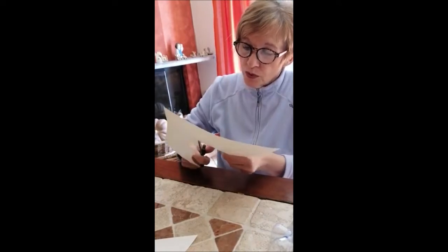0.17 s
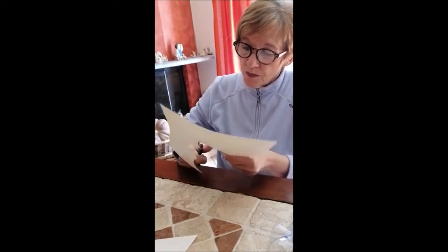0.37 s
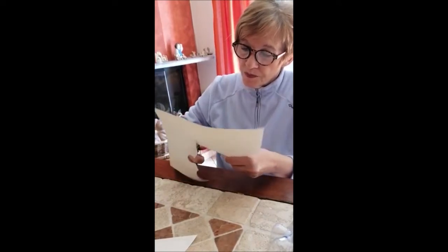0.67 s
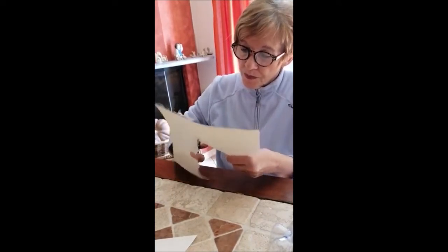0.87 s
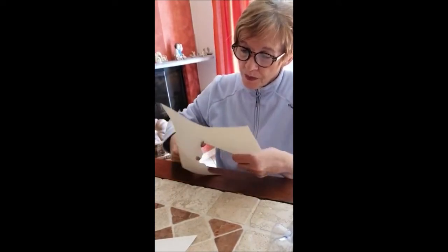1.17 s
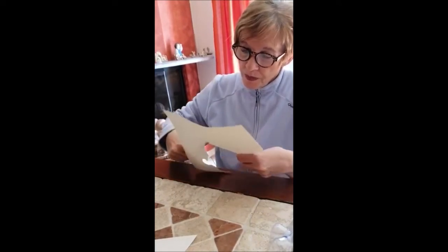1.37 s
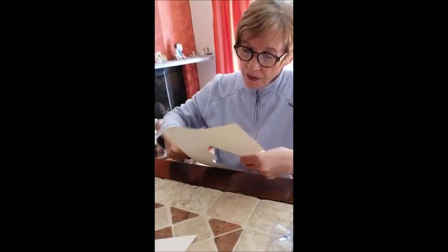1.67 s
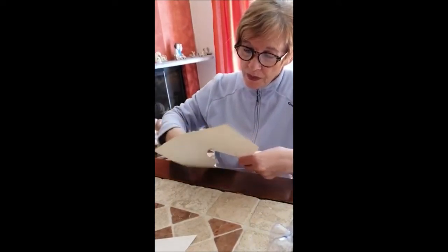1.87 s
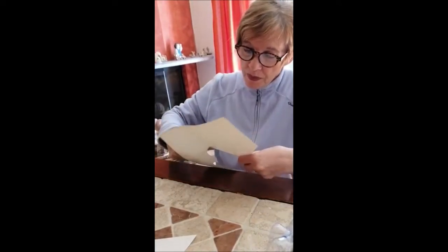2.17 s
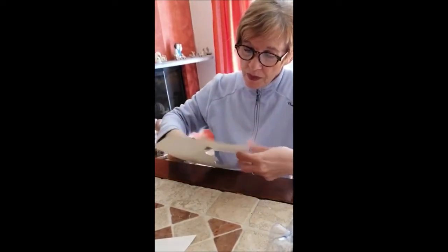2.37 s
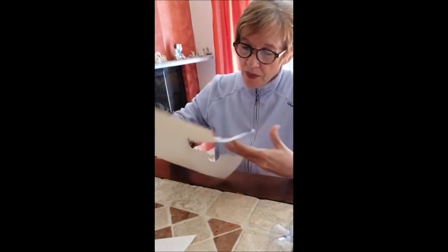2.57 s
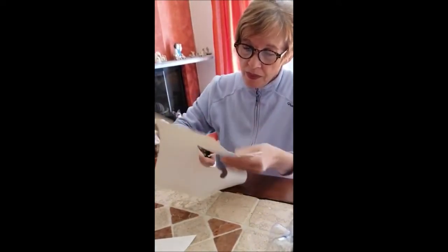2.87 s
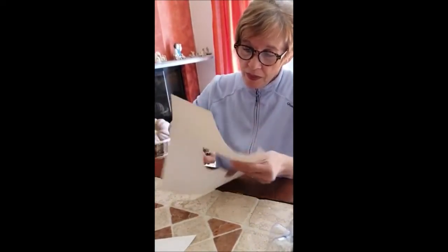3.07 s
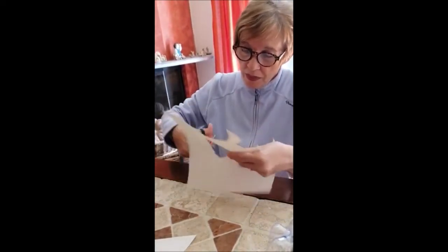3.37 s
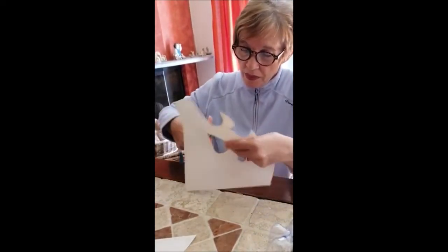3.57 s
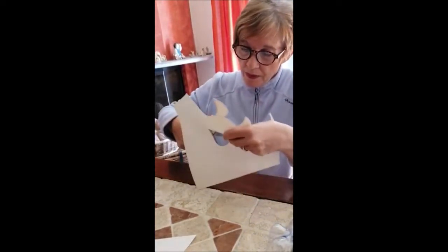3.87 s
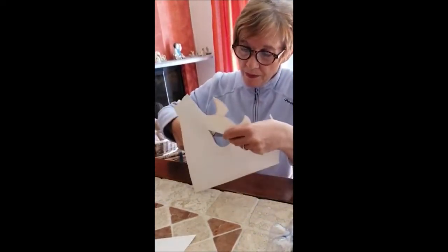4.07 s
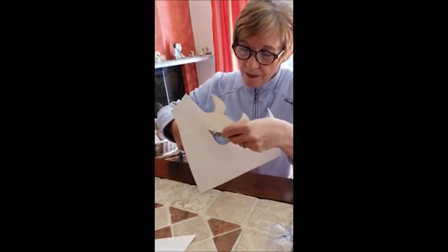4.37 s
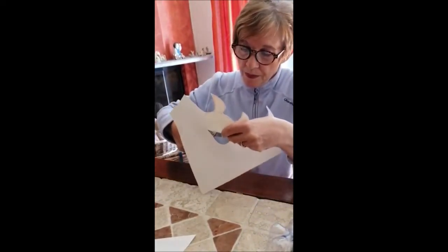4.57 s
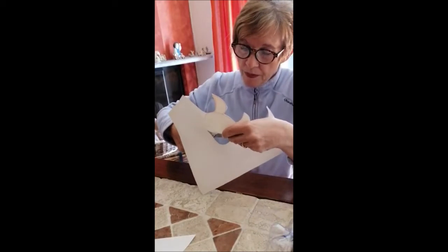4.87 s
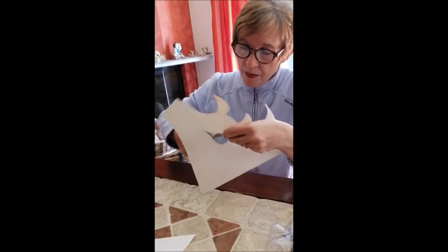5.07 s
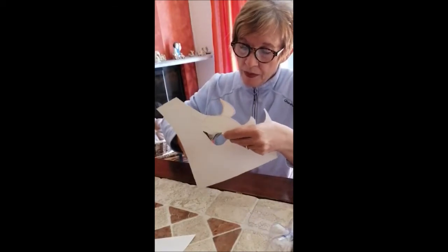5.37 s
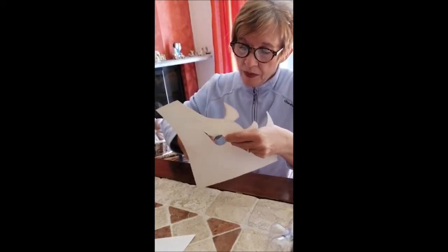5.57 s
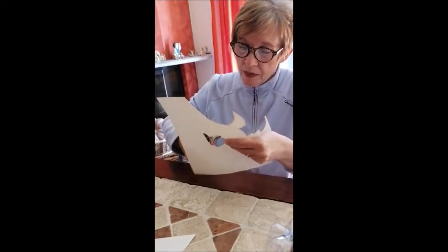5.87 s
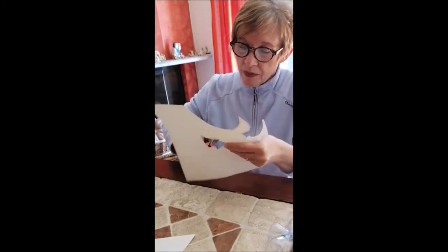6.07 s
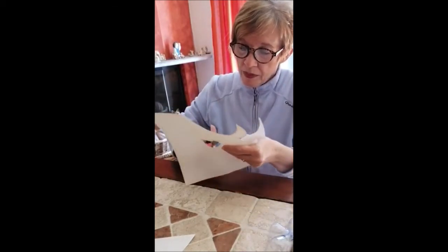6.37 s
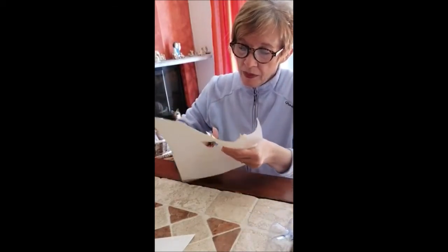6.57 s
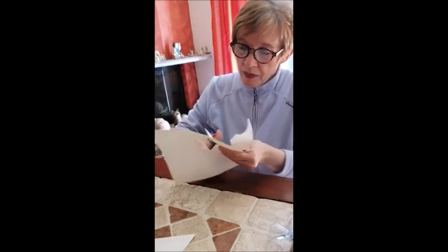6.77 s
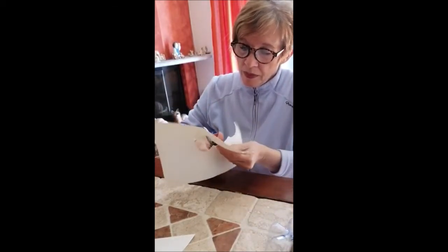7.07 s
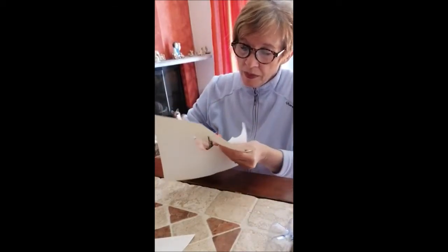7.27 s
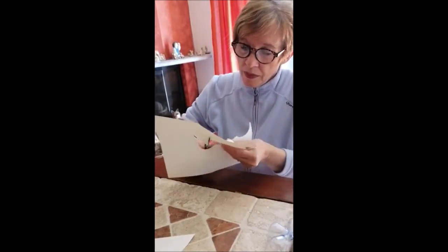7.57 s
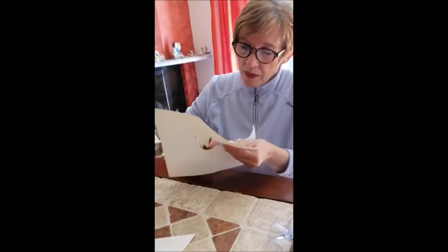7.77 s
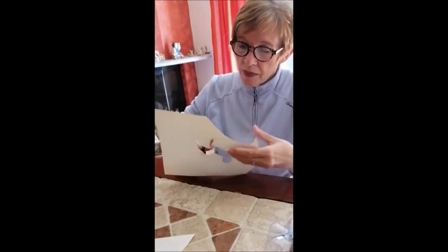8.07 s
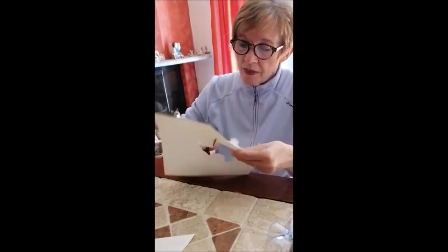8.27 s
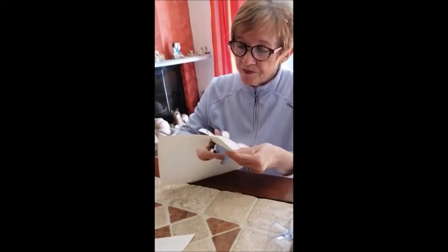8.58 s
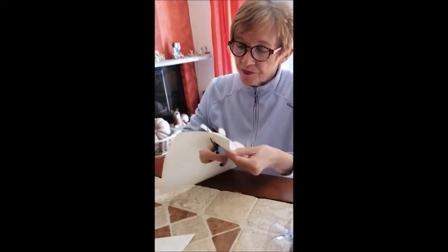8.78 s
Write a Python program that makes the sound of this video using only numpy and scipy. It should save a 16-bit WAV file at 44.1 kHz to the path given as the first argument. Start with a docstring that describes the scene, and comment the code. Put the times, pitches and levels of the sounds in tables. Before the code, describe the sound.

Scissors cut irregularly through stiff paper in a small, quiet room, with crackles, sharp snaps, hollow flexing and light blade ticks.

```python
"""Scissors cut round a shape in stiff paper, held over a table in a small, quiet room.
From the start, parting fibres crackle, the sliding sheet hisses and booms, and fingers rumble on it.
Within a second the paper snaps, hand and sheet knock dully, the blades tick and cut edges fizz.
From about 2 s a blade rasps along the edge now and then; near 5 s and 7 s the steel squeaks faintly.
The cutting goes on to the end, near 9 s. Two microphones hear it all, with the room's echo."""
import sys
import numpy as np
from scipy import signal
from scipy.fft import rfft, irfft
from scipy.io import wavfile

SR = 44100
rng = np.random.default_rng(int(sys.argv[2]) if len(sys.argv) > 2 else 0)


def unload_audio(sound):
    """Save the sound as a 16-bit wav file, at the path given as the first command line argument."""
    columns = np.transpose(np.atleast_2d(sound))
    # keep every value between -1 and 1, then stretch to whole-number steps
    steps = np.round(np.clip(columns, -1, 1) * 32767)
    wavfile.write(sys.argv[1], SR, steps.astype(np.int16))


N = 393813
TIME = np.arange(N) / SR

# Levels are relative: each sound adds its own gain. A swell is the level change from start to end.
# blade strokes and sheet turns: t/s, length/s, swell/dB, crackle/dB, hiss/dB, boom/dB, boom f/Hz
STROKES = [(0.0, 0.056, -25.5, -53.5, -60, -48, 590), (0.082, 0.23, -8.5, -60.5, -61, -56, 520),
           (0.346, 0.11, -4, -57, -58.5, -52, 577), (0.43, 0.26, -8, -61.5, -82, -56.5, 640),
           (0.624, 0.064, 1, -47, -48, -44.5, 615), (0.744, 0.078, -5, -52, -48.5, -52, 695),
           (0.943, 0.29, 2, -58, -53, -56.5, 745), (1.219, 0.18, -10.5, -53, -55.5, -48.5, 805),
           (1.378, 0.14, -6, -60.5, -59, -55.5, 610), (1.562, 0.11, -7.5, -58, -56.5, -50.5, 530),
           (1.746, 0.03, -14, -53, -50, -48, 730), (1.847, 0.15, 7, -59.5, -54, -58, 550),
           (1.994, 0.26, 1.5, -62.5, -61.5, -62, 526), (2.291, 0.072, 3, -51.5, -55, -51, 785),
           (2.443, .31, 7, -79, -65, -76, 545), (2.545, 0.1, 5, -59, -65, -61, 533),
           (2.76, 0.18, 2.5, -54.5, -56, -56.5, 670), (2.967, 0.063, 10, -49, -48, -48, 660),
           (3.091, 0.099, -6, -48.5, -44.5, -56.5, 720), (3.216, 0.13, 2, -52.5, -51, -62, 586),
           (3.437, 0.17, 7, -54.5, -54, -52, 523), (3.65, 0.12, 14, -71, -67, -85, 520),
           (3.776, 0.035, 5.5, -54.5, -53, -65, 700), (3.888, 0.12, 2, -63, -65.5, -68, 587),
           (4.258, 0.13, 7.5, -54.5, -55.5, -63, 675), (4.398, 0.12, -2, -61, -64, -65.5, 800),
           (4.616, 0.019, 1, -63, -64, -96, 494), (4.868, 0.51, 6.5, -56, -52.5, -60.5, 730),
           (5.359, 0.06, -24.5, -54.5, -69, -57, 760), (5.565, 0.09, -7, -56, -56.5, -56.5, 890),
           (5.701, 0.17, -14.5, -60.5, -60.5, -61.5, 890), (6.042, 0.082, -4, -66.5, -69, -64.5, 563),
           (6.17, .2, -11, -56, -50.5, -56.5, 688), (6.535, 0.2, 10.5, -56.5, -53.5, -57.5, 760),
           (6.85, 0.16, 6.5, -57, -58, -60, 614), (7.14, 0.13, 15.5, -58.5, -57.5, -55.5, 575),
           (7.274, 0.053, 2, -52, -54, -55, 670), (7.424, 0.12, -13, -56.5, -54.5, -53.5, 770),
           (7.664, 0.12, 1, -55, -53.5, -59, 760), (7.851, 0.028, -3, -58, -61, -54, 706),
           (7.948, 0.096, 6, -56, -57, -64, 750), (8.027, 0.076, 5.5, -58.5, -55.5, -54.5, 625),
           (8.213, 0.023, -2, -59, -61.5, -55, 536), (8.332, 0.26, 8.5, -53, -52, -56, 537),
           (8.597, 0.21, 4, -53.5, -52.5, -73, 510), (8.793, 0.14, 12, -44.5, -45, -57.5, 646)]
# the fingers change their grip: t/s, length/s, level/dB
GRIPS = [(0.0, 0.22, -60), (1.384, .27, -69), (1.925, .16, -59.5), (2.3, 0.086, -65.5), (2.742, 0.094, -61),
         (3.213, 0.089, -55.5), (3.475, 0.098, -54), (3.854, 0.071, -65.5), (4.396, 0.039, -76),
         (6.18, 0.29, -67.5), (6.786, .12, -71), (7.31, 0.21, -76), (8.037, 0.16, -67.5),
         (8.356, 0.15, -63), (8.553, 0.14, -55.5), (8.76, .18, -68)]
# the sheet snaps under the blades or buckles: t/s, crack/dB, pop/dB, pop f/Hz, treble/dB
SNAPS = [(0.1062, -35.5, -47, 497, -59), (0.2016, -34, -30, 488, -46.5), (0.2849, -47, -52, 450, -52),
         (0.385, -42, -42, 530, -66), (0.4, -28.5, -49, 646, -47.5), (0.4299, -29.5, -36.5, 575, -44),
         (0.4983, -34.5, -43.5, 603, -48.5), (0.7028, -32, -40, 610, -39), (0.9136, -43, -46.5, 680, -51),
         (0.9441, -35.5, -41, 710, -43.5), (0.9751, -35.5, -45.5, 460, -45.5),
         (1.0697, -39, -45.5, 587, -47.5), (1.2304, -34, -39, 853, -52), (1.2852, -31.5, -44, 550, -52),
         (1.3365, -27, -35.5, 672, -40), (1.5918, -29.5, -34.5, 538, -55), (1.6137, -27.5, -40, 508, -47),
         (1.7419, -28, -37.5, 617, -48.5), (1.8784, -47, -42.5, 585, -71), (2.292, -33, -44, 820, -49.5),
         (2.3351, -39, -52, 685, -51), (2.5551, -37.5, -56.5, 546, -53.5), (2.618, -39, -54, 430, -52),
         (2.7632, -38, -50.5, 410, -49), (2.8534, -33, -76, 432, -48), (2.9186, -33.5, -51, 420, -46.5),
         (2.9769, -24, -35.5, 717, -40.5), (2.9849, -27.5, -37.5, 555, -41), (3.014, -30, -41, 520, -40),
         (3.0294, -26.5, -46, 573, -37), (3.1251, -28.5, -54, 834, -44), (3.215, -32.5, -50, 460, -34.5),
         (3.2964, -39, -65, 490, -42), (3.4434, -50, -48.5, 573, -54), (4.413, -36.5, -49.5, 684, -42.5),
         (5.2815, -34, -63, 457, -60), (5.5787, -40, -50, 650, -48.5), (5.7111, -33.5, -61, 660, -51),
         (5.8077, -33.5, -55, 657, -46.5), (6.1788, -27.5, -46, 530, -59), (6.483, -41, -64, 580, -57),
         (6.6621, -35, -47.5, 505, -43), (7.1604, -41, -56.5, 495, -54.5), (7.3873, -34.5, -52, 800, -53.5),
         (7.414, -28, -35.5, 823, -42), (7.442, -36, -42, 780, -51), (7.7204, -36, -39.5, 687, -43),
         (7.778, -44, -49.5, 655, -45), (7.8555, -40.5, -45, 700, -48), (8.0101, -30.5, -71, 660, -43.5),
         (8.03, -29, -74, 581, -49), (8.3784, -38, -44.5, 625, -69), (8.4461, -30.5, -59, 583, -45),
         (8.5686, -30, -52, 560, -44)]
# dull knocks of hand and sheet: t/s, clap/dB, thump/dB
KNOCKS = [(0.135, -54, -55), (2.004, -53, -48.5), (3.296, -20.5, -48.5), (3.545, -19.5, -41.5),
          (3.589, -31, -48), (3.882, -58, -58), (4.414, -31.5, -52.5), (6.7722, -14.5, -37.5),
          (6.777, -11, -47), (8.13, -42, -49.5)]
# the blades tick against each other: t/s, level/dB, f/Hz, share sent into the room/dB
TICKS = [(0.399, -50, 7500, -6), (2.1243, -38, 8100, -9), (3.1784, -27.5, 6840, -10),
         (3.2833, -20, 5500, -0.5), (5.6026, -33, 7100, -16), (6.1775, -24.5, 7500, 0),
         (7.493, -30, 7160, -13), (7.5094, -27.5, 7240, 2), (7.6525, -23.5, 7100, -4),
         (8.8307, -29, 8100, -9)]
# quick slides along a cut edge: t/s, length/s, swell/dB, level/dB
EDGE_SLIDES = [(0.65, 0.065, -8, -51.5), (1.9, 0.072, 8, -56), (2.42, .55, -3, -70.5),
               (2.975, 0.069, -6, -57), (3.04, .25, 0, -72), (3.585, 0.021, -8, -51.5),
               (6.176, 0.022, -15, -40), (6.21, 0.088, -13, -59), (8.52, 0.06, -4, -55),
               (8.74, 0.22, 6, -59)]
# a blade rasps along the cut edge: t/s, length/s, swell/dB, level/dB, f/Hz
RASPS = [(1.867, 0.11, -4, -44.5, 2800), (2.752, 0.11, -21, -48.5, 2490), (3.333, 0.038, 7, -43, 2680),
         (4.89, 0.28, 2, -48, 2700), (6.512, 0.2, -16, -48, 2400), (8.222, .05, -8, -50.5, 2100)]
# steel rubs on steel: t/s, length/s, swell/dB, level/dB
SQUEAKS = [(4.80, 0.11, 14, -53), (4.99, 0.057, -3, -47.5), (6.975, 0.03, -2, -48)]

# tone of parting fibres: f/Hz, level/dB
CRACKLE_TONE = [(400, -34), (800, -11.5), (1400, -3.5), (2000, 1), (3000, -0.5), (3800, -11), (5500, -15.5),
                (9000, -36)]
# tone of sliding paper: f/Hz, level/dB
HISS_TONE = [(1500, -21), (3800, -14.5), (5200, -4.5), (6400, 0), (7300, 3), (8100, 0), (8900, -3),
             (10000, -12), (11000, -17.5), (15000, -28)]
# tone of the bending sheet: f/Hz, level/dB
BOOM_TONE = [(150, -21.5), (300, -10.5), (420, -1.5), (520, 1), (700, -4), (1000, 3), (1400, 2.5),
             (2500, -7)]
# tone of fingers on the sheet: f/Hz, level/dB
RUMBLE_TONE = [(50, -49.5), (120, -0.5), (250, -2), (380, -8), (600, 1), (1500, -57)]
# tone of the background noise: f/Hz, level/dB
AIR_TONE = [(12, -49), (20, 6), (32, -11.5), (134, -14.5), (204, -21.5), (293, -18), (434, -27.5),
            (849, -25.5), (1860, -35.5), (2990, -33.5), (3950, -42), (7110, -59), (9950, -38.5),
            (14700, -34), (16000, -39)]
# tone of a knock's soft thump: f/Hz, level/dB
THUMP_TONE = [(20, -60), (50, -42), (115, -14.5), (185, -1), (300, -3), (490, 5.5), (750, -18), (2000, -38)]
# tone of a knock's papery clap: f/Hz, level/dB
CLAP_TONE = [(50, -55), (200, 1.5), (550, 2), (1000, 5.5), (1400, 5), (2000, 9.5), (3200, 2), (3900, -9.5),
             (4900, -9), (6500, -33), (12000, -48)]
# tone of a sliding cut edge: f/Hz, level/dB
FIZZ_TONE = [(5000, -35), (8000, 6), (9500, 0), (10800, -7), (12500, -5), (15000, -14), (16000, -12)]
# how long the room echoes: f/Hz, time to fade by 60 dB/s
ECHO_TIMES = [(120, 0.66), (500, 0.36), (1000, 0.49), (2500, 0.46), (7000, 0.32), (14000, 0.41)]
# how the two microphones differ: f/Hz, left minus right/dB
MIC_BALANCE = [(55, 5), (130, 0.5), (300, -2.5), (800, -3.5), (1150, -3.5), (1500, 0), (2100, -5),
               (2750, -6.5), (3800, 0), (4600, -2), (5600, -1.5), (7300, -11.5), (8700, 12), (10500, 6.5),
               (14000, -1)]

REST_DB = [-76.5, -75.5, -81.5]  # the held sheet is never quite still: crackle, hiss, boom
ATTACK_S, RELEASE_S = 0.0048, 0.016  # how fast a hand movement takes hold and lets go
MIC_DELAY_S = 0.000411  # time sound takes from one microphone to the other


def amp(db):
    """Turns decibels into a gain to multiply by."""
    return 10 ** (np.asarray(db) / 20)


def unit(x):
    """Scales a signal to an average strength (rms) of 1."""
    return x / np.sqrt(np.mean(x ** 2) + 1e-20)


def look_up(table, hz):
    """Reads between a table's rows on a log-frequency axis."""
    f, value = np.transpose(table)
    return np.interp(np.log(hz + 1), np.log(f), value)


def add(mix, start_s, sound):
    """Mixes a sound in at the given time."""
    part = mix[max(round(start_s * SR), 0):][:len(sound)]
    part += sound[:len(part)]


def colour(x, tone, size=2048):
    """Gives a sound a tone, with a filter that never rings ahead of the sound."""
    log_gain = np.log(amp(look_up(tone, abs(np.fft.fftfreq(size, 1 / SR)))))
    kernel = np.fft.ifft(np.exp(np.conj(signal.hilbert(log_gain)))).real
    return signal.oaconvolve(x, kernel[:size // 2])[:len(x)]


def resonate(x, hz, width_hz):
    """Makes a sound ring at a steady or moving pitch; a narrower width rings longer."""
    turn = np.exp(2j * np.pi * np.cumsum(hz * np.ones(len(x))) / SR)
    decay = np.exp(-np.pi * width_hz / SR)
    return 2 * (turn * signal.lfilter([1 - decay], [1, -decay], x / turn + 1e-18)).real


def grains(per_s, spread_db, clump_db, clump_s):
    """Tiny random breaks: clicks that grow louder and softer in clumps."""
    size = amp(spread_db * np.minimum(rng.exponential(1, N), 4))
    clicks = size * rng.choice([-1, 1], N) * (rng.random(N) < per_s / SR)
    clumps = np.interp(TIME / clump_s, np.arange(N), np.clip(rng.standard_normal(N), -2, 2))
    return unit(clicks * amp(clump_db * clumps))


def burst(decay_s, rise_s, size=4096):
    """A quick run of tiny breaks that swells and dies, nearly as strong at every pitch."""
    t = np.arange(size) / SR
    age = t / decay_s
    shape = np.exp(-age) * (1 - np.exp(-t / rise_s))
    spectrum = rfft(rng.standard_normal(size) * shape)
    return irfft(spectrum / (abs(spectrum) + 1e-12)) * np.exp(-age / 10)


def movement(length_s, swell_db):
    """Gain of one movement: it takes hold, grows or eases, and dies away."""
    t = np.arange(0, length_s + 10 * RELEASE_S, 1 / SR)
    held = amp(swell_db * (np.minimum(t / length_s, 1) - .5))
    return (1 - np.exp(-t / ATTACK_S)) * held * np.exp(-np.maximum(t - length_s, 0) / RELEASE_S)


def gain_of(rows):
    """Gain over time of a list of movements; where they overlap, their powers add."""
    power = np.zeros(N)
    for start_s, length_s, swell_db, level_db in rows:
        add(power, start_s, (amp(level_db) * movement(length_s, swell_db)) ** 2)
    return np.sqrt(power)


def pitch_of(rows, rest_hz):
    """Each movement pulls the paper to its own pitch (last column) while it lasts."""
    weight, total = np.zeros((2, N))
    for start_s, length_s, *_, hz in rows:
        pull = movement(length_s, 0)
        add(weight, start_s, pull)
        add(total, start_s, pull * hz)
    return (total + .01 * rest_hz) / (weight + .01)


def stroke_gains():
    """Gains of crackle, hiss and boom: the strokes on top of the held sheet's faint stir."""
    rows = np.array(STROKES)
    return [np.hypot(gain_of(np.c_[rows[:, :3], level_db]), amp(rest_db))
            for level_db, rest_db in zip(rows[:, 3:6].T, REST_DB)]


def catches(per_s=30, height=2.67, decay_s=0.0053):
    """The paper catches and gives at random: a gain with small surges."""
    gives = (rng.random(N) < per_s / SR) * rng.random(N)
    surges = signal.lfilter([1], [1, -np.exp(-1 / (decay_s * SR))], gives)
    return unit(1 + height * surges)


def cutting(crackle_gain, hiss_gain, boom_gain):
    """Fibres part and crackle, paper hisses along the blades, and the sheet's tension tunes its boom."""
    breaks = grains(per_s=800, spread_db=0, clump_db=3, clump_s=0.0051)
    crackle = unit(colour(breaks, CRACKLE_TONE)) * crackle_gain * amp(1.7)
    sliding = grains(per_s=1600, spread_db=4, clump_db=1.5, clump_s=0.005)
    hiss = unit(colour(sliding, HISS_TONE)) * hiss_gain * amp(3.5)
    pitch = pitch_of(STROKES, rest_hz=614)
    bending = colour(grains(per_s=400, spread_db=1.5, clump_db=4.5, clump_s=0.015), BOOM_TONE)
    boom = unit(resonate(resonate(bending, pitch, 450), pitch, 1160)) * boom_gain * amp(0.5)
    return catches() * (crackle + hiss + boom)


def crinkles(crackle_gain, hiss_gain, rise_cycles=1.52, pitches=24, per_pitch=28):
    """Small creases give way one by one, each ringing briefly at its own pitch."""
    out, t = np.zeros(N), np.arange(400) / SR
    times = rng.uniform(0, N / SR, (pitches, per_pitch))
    sizes_db = 4.75 * np.minimum(rng.exponential(1, times.shape), 3)
    for hz, starts, row_db in zip(np.geomspace(1600, 9500, pitches), times, sizes_db):
        age = t * hz / rise_cycles
        ring = age * np.exp(1 - age) * np.sin(2 * np.pi * hz * t)
        gain, tone = (crackle_gain, CRACKLE_TONE) if hz < 4000 else (hiss_gain, HISS_TONE)
        for start_s, size_db in zip(starts, row_db):
            add(out, start_s, ring * gain[int(start_s * SR)] * amp(look_up(tone, hz) + size_db + 7.5))
    return out


def finger_rumble(hold_db=-75):
    """Fingers rumble on the sheet: faintly as they hold it, more as they change grip."""
    rub = grains(per_s=300, spread_db=5, clump_db=-3.5, clump_s=0.012)
    grip = gain_of((start_s, length_s, 0, db) for start_s, length_s, db in GRIPS)
    return unit(colour(rub, RUMBLE_TONE)) * np.hypot(grip, amp(hold_db)) * amp(1.5)


def from_all_sides(pair):
    """Spectra of sound from all around: the microphones share the bass and differ in the treble."""
    hz, t, (left, other) = signal.stft(pair, SR, nperseg=512)
    shared = np.sinc(2 * hz * MIC_DELAY_S)[:, None] * 0.89
    right = shared * left + np.sqrt(1 - shared ** 2) * other
    return hz, t, np.array([left, right])


def air():
    """The still room and the microphones' own hiss."""
    _, _, spectra = from_all_sides(rng.standard_normal((2, N)))
    still_room = signal.istft(spectra, SR, nperseg=512)[1][:, :N]
    mic_hiss = 4.8 * rng.standard_normal((2, N))
    return unit(np.array([colour(x, AIR_TONE, size=8192) for x in still_room + mic_hiss])) * amp(-67.3)


def pop(hz, rise_s=0.0026, sag=0.044):
    """The sheet springs over: a few cycles that swell, fade and sink in pitch as the tension goes."""
    age = np.arange(4096) / SR / rise_s
    pitch = hz * (1 + sag * np.exp(-age / 2))
    return age * np.exp(-age) * np.sin(2 * np.pi * np.cumsum(pitch) / SR)


def snaps(decay_s=0.0037, rise_s=0.0033):
    """The paper gives with a sharp crack, a hollow pop and a flutter at nearby pitches."""
    out = np.zeros(N)
    for start_s, crack_db, pop_db, hz, treble_db in SNAPS:
        jolt = colour(burst(decay_s, rise_s=0.0028), BOOM_TONE)
        flutter = resonate(resonate(jolt, hz, 550), hz, 1180)
        body = (0.75 * unit(pop(hz)) + 0.45 * unit(flutter)) * amp(pop_db - 9.5)
        crack = unit(colour(burst(decay_s, rise_s), CRACKLE_TONE)) * amp(crack_db - 21.5)
        treble = unit(colour(burst(decay_s, rise_s), HISS_TONE)) * amp(treble_db - 7.5)
        add(out, start_s, body + crack + treble)
    return out


def knocks():
    """Hand and sheet knock: a soft thump under a tight papery clap."""
    out = np.zeros(N)
    for start_s, clap_db, thump_db in KNOCKS:
        thump = unit(colour(burst(decay_s=.002, rise_s=.0004), THUMP_TONE)) * amp(thump_db - 7.5)
        clap = unit(colour(burst(decay_s=.0014, rise_s=.0002), CLAP_TONE)) * amp(clap_db - 22)
        add(out, start_s, thump + clap)
    return out


def ticks():
    """Blades touch and the hand stops their ring at once; gives the direct sound and the room's share."""
    near, to_room = np.zeros((2, N))
    for start_s, level_db, hz, room_db in TICKS:
        strike = burst(decay_s=0.0015, rise_s=0.0037)
        ring = unit(resonate(strike, hz, 430))
        click = unit(colour(strike, HISS_TONE)) + 0.38 * unit(colour(strike, CRACKLE_TONE))
        tick = ring + click + 0.033 * unit(strike)
        tick *= amp(level_db + 0.5) / abs(tick).max()
        add(near, start_s, tick)
        add(to_room, start_s, tick * amp(room_db))
    return near, to_room


def edge_fizz():
    """Cut edges fizz as they slide."""
    rub = grains(per_s=3200, spread_db=-1, clump_db=4, clump_s=0.0079)
    return unit(colour(rub, FIZZ_TONE)) * gain_of(EDGE_SLIDES) * amp(6)


def rasps():
    """The dragged edge sticks and slips, ringing the strip of paper beside the blade."""
    pitch = pitch_of(RASPS, rest_hz=2450)
    slips = grains(per_s=1300, spread_db=-2, clump_db=5.5, clump_s=0.013)
    strip = resonate(resonate(slips, pitch, 750), pitch, 810)
    return unit(strip) * gain_of(row[:4] for row in RASPS) * amp(-7)


def squeaks():
    """Slowly closing blades rub, and the steel sings a thin note on top of the scrape."""
    rub = grains(per_s=4400, spread_db=8.5, clump_db=2.5, clump_s=.01)
    scrape = resonate(resonate(rub, 6000, 1900), 6800, 2500)
    note = resonate(scrape, hz=6250, width_hz=270)
    return (0.85 * unit(note) + 0.5 * unit(scrape)) * gain_of(SQUEAKS) * amp(2.5)


def direct_path(x):
    """The straight path loses a little treble, and some bass as the sheet's two faces cancel."""
    return colour(x, [(100, -2.8), (500, 0.069), (3000, -1.62), (12000, -3.6)])


def turn_taking(per_s, index, count):
    """One of several fades that take turns; their squares add up to one."""
    away = abs((TIME * per_s - index + count / 2) % count - count / 2)
    return np.cos(np.pi / 2 * np.minimum(away, 1))


def echo(early_boost=0.91, early_s=0.018):
    """Many reflections, strongest from the table and near walls; each pitch fades at its own speed."""
    t = np.arange(SR // 2) / SR
    bounces = rng.standard_normal((2, len(t))) * (rng.random((2, len(t))) < 5000 / SR)
    strength = (t > .0025) * (1 + early_boost * np.exp(-t / early_s))
    hz, frame_s, spectra = from_all_sides(bounces * strength)
    fade = 1000 ** (-frame_s / look_up(ECHO_TIMES, hz)[:, None])
    tail = signal.istft(spectra * fade, SR, nperseg=512)[1]
    return tail / np.linalg.norm(tail[0])


def room(straight, to_room, count=5):
    """Several echoes and microphone lags quickly take turns, keeping the room sound smooth and wide."""
    out = np.zeros((2, N))
    for k, lag_s in enumerate(rng.permutation(np.linspace(-MIC_DELAY_S, MIC_DELAY_S, count))):
        near = straight * turn_taking(13, k, count) ** 2
        far = to_room * turn_taking(67, k, count)
        out += [near, np.interp(TIME - lag_s, TIME, near)]
        out += signal.oaconvolve(far[None], echo(), axes=1)[:, :N]
    return out


def scene():
    """Paper and steel in the room: part of each sound arrives straight, part as echo."""
    crackle_gain, hiss_gain, boom_gain = stroke_gains()
    steady = cutting(crackle_gain, hiss_gain, boom_gain) + crinkles(crackle_gain, hiss_gain)
    steady += finger_rumble() + edge_fizz() + rasps() + squeaks()
    snap, knock = snaps(), knocks()
    tick_near, tick_to_room = ticks()
    straight = direct_path(0.75 * steady + 0.88 * snap + 0.65 * knock) + tick_near
    to_room = 0.76 * steady + 0.68 * snap + 0.61 * knock + tick_to_room
    return room(straight, to_room) + air()


def record(dry, top_hz=15700):
    """Each microphone has its own tone, and the highest treble is cut off."""
    hz, lean_db = np.transpose(MIC_BALANCE)
    shared_db = 10 * np.log10((amp(lean_db) + amp(-lean_db)) / 2)  # keeps the total power even
    mics = np.array([colour(x, np.c_[hz, side * lean_db / 2 - shared_db])
                     for x, side in zip(dry, (1, -1))])
    low_pass = signal.firwin(255, top_hz, window=("kaiser", 8), fs=SR)
    return signal.oaconvolve(mics, low_pass[None], "same")


dry = scene()
out = record(dry)
unload_audio(out)
```